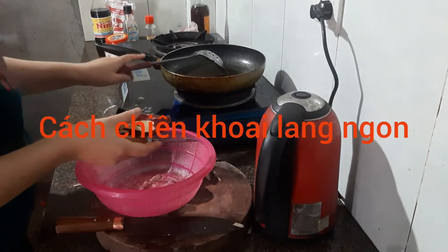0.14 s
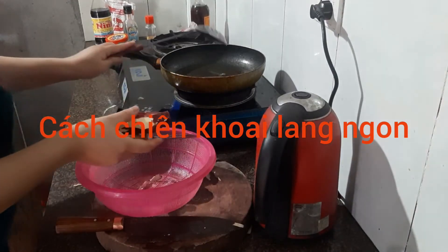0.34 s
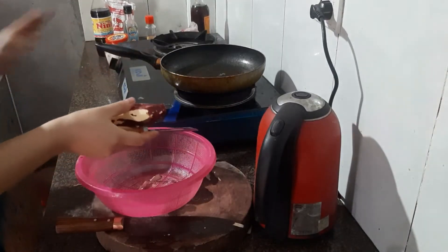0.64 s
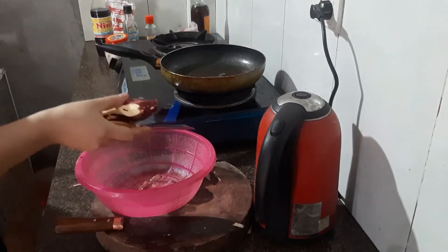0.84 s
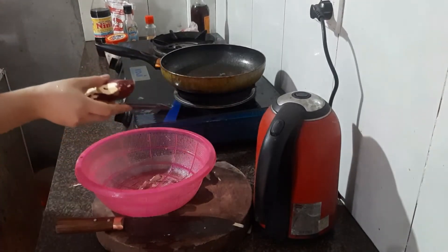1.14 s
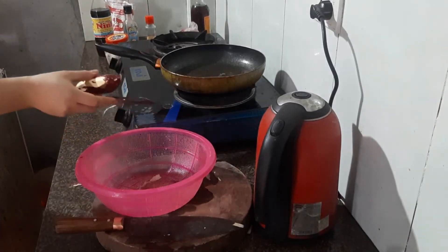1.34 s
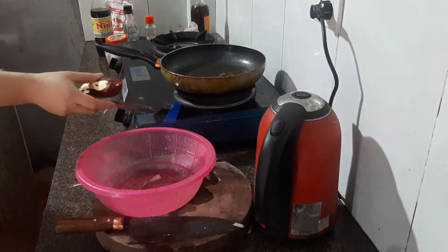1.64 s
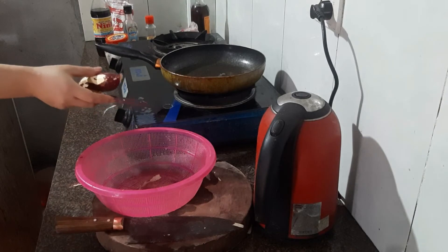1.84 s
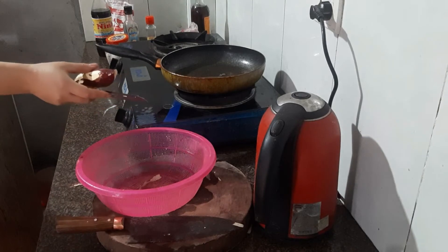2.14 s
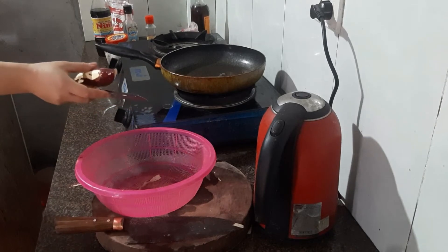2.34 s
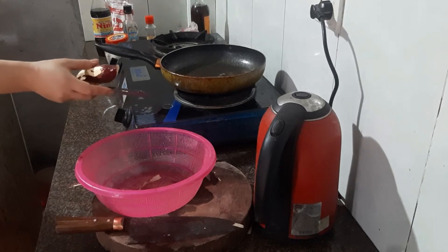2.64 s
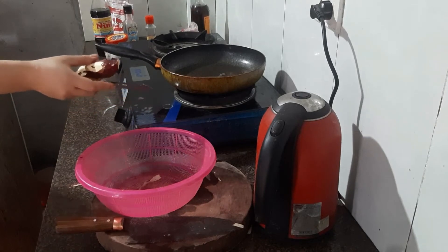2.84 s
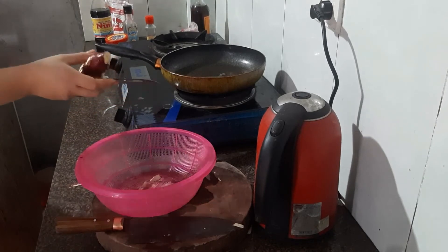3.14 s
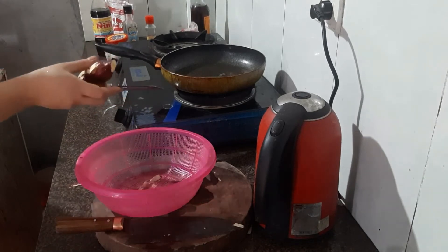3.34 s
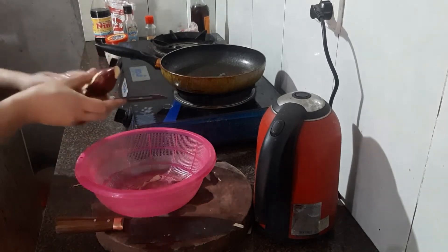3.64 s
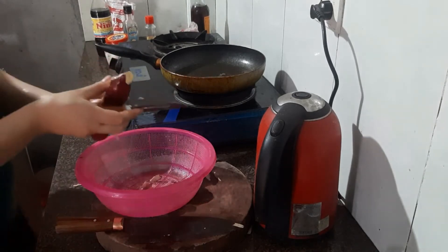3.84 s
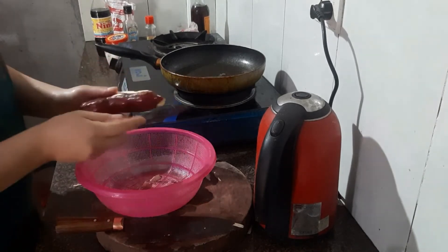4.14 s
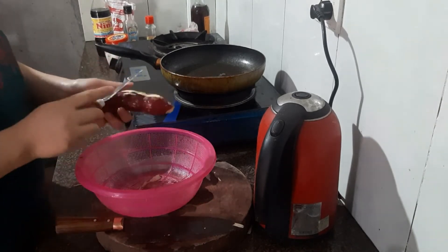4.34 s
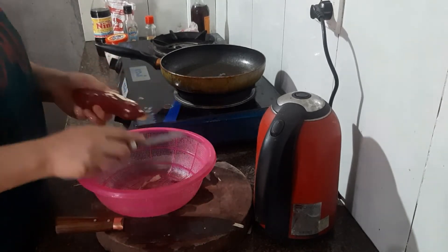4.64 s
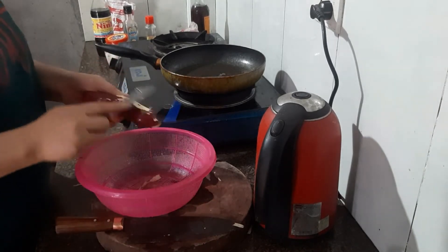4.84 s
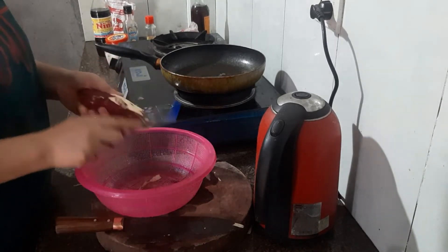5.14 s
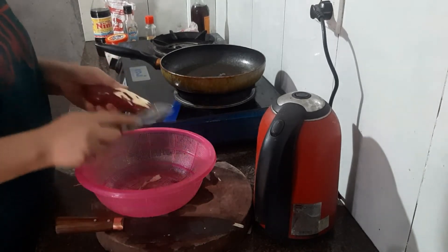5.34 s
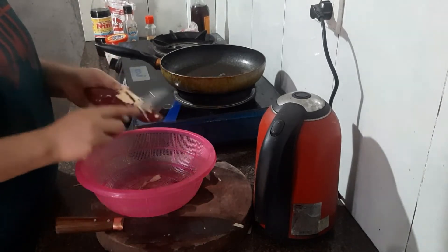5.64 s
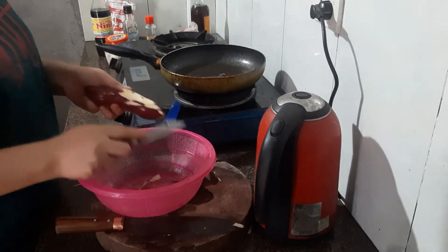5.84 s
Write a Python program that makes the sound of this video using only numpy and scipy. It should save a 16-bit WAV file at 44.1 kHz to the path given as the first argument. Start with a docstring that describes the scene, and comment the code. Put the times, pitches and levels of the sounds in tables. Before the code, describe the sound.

Kitchenware clatters and scrapes on a hard surface, then a small blade rasps at a raw tuber while an engine slows outside.

```python
"""Kitchen ware close by, left of centre in a hard-walled room: a dish taps down, metal and a basin are
knocked and scraped, then a blade peels a raw tuber. Blows and grit ring decaying modes; the peel is rasping noise.
Outside a single-cylinder engine slows as it passes, its low orders swelling in the room's bass modes.
Farther off, shaped noise makes street wash, a faint whine and an insect band; gliding tones make bird chirps."""
import sys
import numpy as np
from scipy import signal
from scipy.fft import rfft, irfft, next_fast_len
from scipy.io import wavfile
from scipy.ndimage import uniform_filter1d

SR = 44100
rng = np.random.default_rng(int(sys.argv[2]) if len(sys.argv) > 2 else 0)


def digitize_waveform(pressure):
    """Quantize a signal to 16-bit integers and store it at the path in sys.argv[1].

    Rows of a 2-D input are taken as channels; values are limited to [-1, 1].
    """
    field = np.atleast_2d(pressure).T
    bounded = np.clip(field, -1, 1)
    quanta = np.round(bounded * 32767).astype(np.int16)
    wavfile.write(sys.argv[1], SR, quanta)


N = 264159
# Table levels are relative: the room and the microphone act on them later.
LEAD_SAMPLES = 16  # sound reaches the left microphone port this much sooner


def amp(db):
    """Decibels to gain."""
    return 10 ** (np.asarray(db) / 20)


def evened(x):
    """Scales to rms 1."""
    return x / np.sqrt(np.mean(x ** 2) + 1e-20)


def read(points, hz):
    """Reads a spectrum table on a log-frequency axis."""
    f, value = np.transpose(points)
    return np.interp(np.log(hz + 1), np.log(f + 1), value)


def curve(rows):
    """Joins a (time, value) table over the whole time axis, holding its end values."""
    s, value = np.transpose(rows)
    return np.interp(np.arange(N) / SR, s, value)


def swell(start, length, db, start_db, fall_db_per_s):
    """Gain that climbs from start_db (relative to its top) over length, then falls steadily."""
    t = np.arange(N) / SR - start
    climb_db = start_db * np.clip(1 - t / length, 0, 1)
    fall_db = fall_db_per_s * np.maximum(t - length, 0)
    return (t > 0) * amp(db + climb_db - fall_db)


def colour(x, points):
    """Shapes the spectrum along the last axis."""
    size = next_fast_len(N + 4096)
    gain = amp(read(points, np.fft.rfftfreq(size, 1 / SR)))
    return irfft(rfft(x, size) * gain, size)[..., :N]


def ring(modes):
    """Impulse response of a struck object: decaying sines, each t60 at least 0.01 s."""
    t = np.arange(SR // 2) / SR
    out = 0
    for k, (hz, db, t60) in enumerate(modes):
        # neighbours start in opposite directions, which keeps the valleys and the bass clear
        out = out + (-1) ** k * amp(db - 60 * t / max(t60, .01)) * np.sin(2 * np.pi * hz * t)
    return out


def grains(rate, spread_db):
    """Random slips of uneven size and either sign, about rate a second, at rms 1."""
    size = amp(spread_db * np.minimum(rng.exponential(1, N), 4))
    sign = rng.choice([-1., 1.], N)
    return evened(size * sign * (rng.random(N) < rate / SR))


# How alike the two ports hear spread-out sound: pitch_hz, likeness (1 is identical)
PORT_LIKENESS = [(60, 1), (180, 0.93), (550, 0.96), (1650, -0.029), (4970, 0.2), (15000, -0.088)]


def diffuse(shape, patchy_db):
    """Two-port noise of rms 1 with drifting patches; shape gives the gain at each Hz."""
    frames, hz = N // 512 + 5, np.fft.rfftfreq(2048, 1 / SR)
    a, b, c, d, patches = rng.standard_normal((frames, 1025, 5)).T
    patches = uniform_filter1d(patches, size=14, axis=0)
    patches = evened(uniform_filter1d(patches, size=8, axis=1))
    same = np.clip(read(PORT_LIKENESS, hz), -1, 1)[:, None]
    left = a + 1j * b
    right = same * left + np.sqrt(1 - same ** 2) * (c + 1j * d)
    right *= np.exp(-2j * np.pi * hz * LEAD_SAMPLES / SR)[:, None]
    z = np.array([left, right]) * shape(hz)[:, None] * amp(patchy_db * patches)
    return evened(signal.istft(z, nperseg=2048, noverlap=1536)[1][:, :N])


# Spectra of the far street, as pitch_hz, relative level_db per Hz
RUMBLE = [(20, -13), (35, -20), (50, -4.5), (70, 0), (100, -2), (140, -5.5), (170, -8.5), (250, -20.5),
          (400, -43)]
ROAR = [(100, -29), (200, -4.5), (350, -0.5), (600, -10), (1100, -15.5), (2500, -28.5)]
TYRES = [(300, -38), (600, -7.5), (1000, -8.5), (1600, -10), (2500, -15), (4000, -20), (8000, -41)]
HISS = [(500, -29), (2000, 14), (3200, 1), (4400, 14), (5900, 4), (6500, -46), (11000, 3), (16000, -6)]
HISS_DB = -69
# Steady far traffic: rumble_db, roar_db, tyre_db
TRAFFIC_DB = (-56.5, -63, -71)
# Far vehicles going by: nearest_s, half_amplitude_s (time to fall to half amplitude), rumble_db, roar_db, tyre_db
PASSES = [(.15, 0.43, -67, -55.5, -58), (2, 0.17, -54, -76, -71), (4.65, 0.33, -47, -61.5, -55.5)]
# Narrow fuzzy hums, whine and insect band among them: pitch_hz, width_hz (at half gain), level_db
HUMS = [(68.3, 6.4, -65), (86.5, 7.3, -66.5), (143, 10, -67), (220.6, 11.2, -60), (189.6, 11, -68.5),
        (1510, 140, -71.5), (4300, 890, -76.5), (6030, 40, -81.5), (11800, 41, -82)]


def street():
    """Rumble, roar and tyre noise swell as far vehicles pass, over patchy hiss and narrow fuzzy hums."""
    t = np.arange(N) / SR
    power = amp(TRAFFIC_DB)[:, None] ** 2
    for nearest, half, *db in PASSES:
        power = power + amp(db)[:, None] ** 2 / (1 + ((t - nearest) / half) ** 2) ** 2
    gains = [*np.sqrt(power), amp(HISS_DB)]
    out = 0
    for shape, gain in zip((RUMBLE, ROAR, TYRES, HISS), gains):
        out = out + gain * diffuse(lambda hz: amp(read(shape, hz)), patchy_db=2.94)

    def peaks(f):
        """One narrow peak for each hum."""
        return sum(amp(db) / np.sqrt(w) / (1 + ((f - hz) / w * 2) ** 2) for hz, w, db in HUMS)

    hums_db = 10 * np.log10(sum(amp(db) ** 2 for _, _, db in HUMS))
    return out + amp(hums_db) * diffuse(peaks, patchy_db=4.0)


# Modes of the small dish: pitch_hz, level_db, t60_s
DISH = [(880, 3, 0.07), (1345, 4.5, 0.04), (1770, -1, 0.11), (1950, -3.5, 0.087), (2100, -3, 0.056),
        (2620, -0.5, 0.11), (3330, -13, 0.11)]
# The dish is set down and rocks: start_s, level_db
DISH_TAPS = [(0.225, -45), (0.285, -63), (0.315, -60)]


def dish():
    """Light taps ring the modes of the crockery."""
    rung = ring(DISH)
    return sum(np.pad(amp(db) * rung, (round(s * SR), N))[:N] for s, db in DISH_TAPS)


# Strong modes of the metal ware: pitch_hz, level_db, t60_s
METAL = [(1460, -13.5, 0.14), (1530, 0.5, 0.051), (2070, -8, .06), (2298, -0.5, 0.044), (2367, -0.5, 0.084),
         (2560, 4.5, 0.017), (2706, 1.5, 0.062), (2866, -7, 0.07), (3780, -15, 0.15), (4900, -1.5, 0.033),
         (5190, 1, 0.01), (6300, -1.5, 0.037), (6600, -12, 0.026), (7260, -10, 0.073), (8350, 6, 0.052),
         (10360, 5, 0.018), (11120, -10.5, 0.24), (12480, -17, 0.043)]


def metal():
    """Impulse response of the ware: strong modes over a dense crowd of short, weak ones."""
    spot, size = rng.random((2, 90))
    hz = 1750 * 7.5 ** spot
    return ring(METAL) + ring(zip(hz, -15 + 8 * size, 0.032 + 0 * hz))


# Blows: start_s, crack_db, crack_tilt_db (an octave), cabinet_db, basin_db, metal_db
KNOCKS = [(0.225, -27.5, -11.5, -52, -52, -90), (1.507, -22.5, -9, -31, -84, -86),
          (1.518, -30.5, 11, -31.5, -44.5, -85), (1.541, -30, 20, -39.5, -72, -90),
          (1.571, -32.5, -5.5, -56, -79, -90), (1.868, -14, 3, -40, -39.5, -24.5),
          (2.313, -30, 9, -76, -43.5, -77), (2.397, -19, 26, -77, -21, -25.5),
          (2.41, -16, 6, -72, -39.5, -34), (2.424, -25, 16, -38.5, -40, -47),
          (2.596, -36, 18, -73, -43, -41), (2.618, -42, 16, -78, -55, -77),
          (2.642, -49, 8, -74, -47.5, -74)]
# The blade nicks the tuber or a peel drops in the basin: start_s, crack_db, basin_db
NICKS = [(2.981, -38, -66), (4.684, -48, -79), (4.983, -47, -55), (5.199, -32, -56.5), (5.72, -37, -63)]
NICK_TILT_DB = 2  # an octave
# Modes of the cabinet and of the plastic basin: pitch_hz, level_db, t60_s
CABINET = [(50, -3.5, 0.4), (100, -8, 0.099), (213.4, 3, 0.12), (235.6, -2.5, 0.055), (283, -9, 0.12),
           (374, -14, 0.077)]
BASIN = [(120.5, -8.5, 0.4), (342, -8, 0.1), (394.3, -1, 0.069), (491, 4, 0.041), (542, 4.5, 0.043),
         (807, 4, 0.017), (900, 2, 0.029), (969, 15.5, 0.0093), (1223, 11.5, 0.016), (1527, 15, 0.014),
         (1860, 4, 0.012), (2036, 8.5, 0.017), (2470, 1, 0.024), (3020, -0.5, 0.018), (3710, -2.5, 0.018)]


def knocks(ware):
    """Each blow is a click that cracks and rings the cabinet, the plastic basin and the metal."""
    crack, blows = np.zeros(N + 1024), np.zeros((3, N))
    hz = np.fft.rfftfreq(1024, 1 / SR)
    nicks = [(s, db, NICK_TILT_DB, -np.inf, basin_db, -np.inf) for s, db, basin_db in NICKS]
    for s, db, tilt_db, *strength_db in KNOCKS + nicks:
        at = round(s * SR)
        # little bass from a small contact; each blow's own tilt makes it dull or bright
        tilt = amp(tilt_db * np.log2((hz + 700) / 2000))
        click = irfft(tilt * hz ** 2 / (hz ** 2 + 400 ** 2))
        click = np.roll(click, 64) * signal.windows.tukey(1024, .1)
        # every click has the same energy before its crack_db
        crack[at - 64:at + 960] += amp(db) * click / np.linalg.norm(click) * 4
        blows[:, at] = amp(strength_db)
    # a light basin moves no air below its lowest mode
    high_pass = signal.butter(3, 105, "high", fs=SR, output="sos")
    bodies = ring(CABINET), signal.sosfilt(high_pass, ring(BASIN)), ware
    rung = sum(signal.fftconvolve(x, body)[:N] for x, body in zip(blows, bodies))
    return crack[:N] + rung


# Metal scrapes over the worktop: loudest_s, build_up_s, level_db
SCRAPES = [(2.313, 0.016, -37), (2.383, 0.062, -32.5), (2.451, 0.041, -38), (2.598, 0.027, -42)]
SCRAPE_START_DB, SCRAPE_FALL_DB_PER_S = -26, 552  # start is relative to the loudest point


def drag(ware):
    """Stick-slip grit hisses and rings both metal and basin."""
    level = sum(swell(s - build, build, db, SCRAPE_START_DB, SCRAPE_FALL_DB_PER_S) for s, build, db in SCRAPES)
    slips = grains(4000, 1.0) * level
    body = amp(-47) * ware + amp(-34.0) * ring(BASIN)
    hiss = colour(slips, [(200, -33), (600, -36), (1500, 7.0), (5000, 7.5), (15000, 3.0)])
    return hiss + signal.fftconvolve(slips, body)[:N]


# The engine slows outside: time_s, firings_per_s
FIRING = [(2.5, 24.6), (3, 24.4), (3.25, 24.1), (3.6, 23.1), (4, 22.1), (4.35, 21.3), (4.7, 20.7),
          (5.17, 19.8), (5.5, 19.2), (5.99, 18.2)]
# Orders as multiples of the firing rate, and the level_db of each at the pipe
ORDER_NUMBERS = (2, 3, 3.5, 4, 5, 6, 7)
ORDER_DB = (-8, 5, -11, 0.5, -4.5, -8.5, -18)
# The engine's passage, before order and room-mode gains: time_s, level_db
ENGINE_LEVEL = [(2.5, -60), (2.8, -48.5), (3.1, -44.0), (3.4, -47.5), (3.7, -54), (4.1, -47), (4.5, -51.5),
                (4.8, -49.5), (4.95, -51), (5.15, -38.5), (5.5, -33.5), (5.7, -35.5), (5.99, -48)]
# Bass modes of the kitchen: pitch_hz, width_hz (offset where gain is a quarter), level_db
BASS_MODES = [(44, 3.6, 1.5), (57.6, 0.49, -21), (63.04, 2.2, 8), (69.3, 1.5, -3.5), (80.66, 2.9, 5),
              (101.45, 4.65, 5.5), (121.14, 1.7, 2), (140.5, 3.3, -5)]


def engine():
    """Orders of the firing rate slide down, each swelling as it meets a bass mode of the room."""
    fade = np.clip((np.arange(N) / SR - FIRING[0][0]) * 10, 0, 1)
    rate = curve(FIRING)
    turns = np.cumsum(rate) / SR + rng.random()  # one shared phase keeps the orders in step

    def boost(f):
        """Gain of the room's bass modes at each Hz."""
        return sum(amp(db) / (1 + ((f - hz) / w) ** 2) ** 2 for hz, w, db in BASS_MODES)

    orders = 0
    for k, db in zip(ORDER_NUMBERS, ORDER_DB):
        orders = orders + amp(db) * boost(k * rate) * np.cos(2 * np.pi * k * turns)
    return fade * np.sqrt(2) * amp(curve(ENGINE_LEVEL)) * orders


# Peeling strokes: start_s, length_s (of the climb), level_db, first_bite_db (relative to level_db)
STROKES = [(2.99, 0.066, -61, -3), (4.531, 0.08, -52.5, -6.5), (4.653, 0.021, -52, -15),
           (5.069, 0.1, -47.5, -8.5), (5.609, 0.12, -50.5, -0.5)]
# Spectrum of the rasp: pitch_hz, relative level_db per Hz
BLADE = [(1000, -15), (2000, 0.5), (3000, 1.5), (4000, 5.5), (5300, 2.5), (6400, 8), (7800, 2.5),
         (11000, 5), (16000, -0.5)]
BITE_S, LIFT_DB_PER_S = 0.022, 146  # level smoothing time; fall after each stroke


def peeling():
    """The blade bites, digs in and tears fibres in a dense, fine rasp that the walls scatter."""
    level = sum(swell(*row, LIFT_DB_PER_S) for row in STROKES)
    level = uniform_filter1d(level, max(int(BITE_S * SR), 1))
    near = evened(colour(grains(3300, 2.6), BLADE))
    far = diffuse(lambda hz: amp(read(BLADE, hz)), patchy_db=1)
    return level * (0.25 * near + 1.46 * far)


# Far bird: start_s, length_s, first_pitch_hz, last_pitch_hz, level_db
CHIRPS = [(3.66, 0.047, 6850, 6700, -63), (3.735, .055, 5850, 5340, -59.5),
          (3.878, .135, 5900, 4320, -57.5)]
# share of the length in which pitch settles; rise time; start and end level relative to the top
CHIRP_DROP, CHIRP_RISE_S, CHIRP_FADE_DB = .25, 0.013, -19


def bird():
    """Far falling chirps: gliding sines blurred by a quick random waver of pitch."""
    out = np.zeros(N)
    for start, length, first_hz, last_hz, db in CHIRPS:
        t = np.arange(N) / SR - start
        settling = np.exp(-(np.maximum(t, 0) / length / CHIRP_DROP) ** 2)
        hz = last_hz + (first_hz - last_hz) * settling
        level = (t < length) * swell(start, CHIRP_RISE_S, db, CHIRP_FADE_DB, -CHIRP_FADE_DB / length)
        waver = 1 + .012 * evened(uniform_filter1d(rng.standard_normal(N), size=200))
        out += uniform_filter1d(level, size=300) * np.sin(2 * np.pi * np.cumsum(hz * waver) / SR)
    return out


# Decay of the hard-walled kitchen: pitch_hz, t60_s
ROOM = [(100, 0.19), (300, 0.77), (1000, 0.55), (4000, 0.63), (15000, 0.37)]


def room(x, direct_db):
    """Direct sound plus a tail of sparse random taps that builds up, each band dying at its own speed."""
    taps = np.zeros((2, SR))
    grid = np.arange(60, SR - 20, 12)
    at = grid + rng.integers(0, 12, (2, len(grid)))
    np.put_along_axis(taps, at, rng.choice([-1., 1.], at.shape), 1)
    hz, t, z = signal.stft(taps, SR, nperseg=512)
    same = 1 / (1 + (hz[:, None] / 520) ** 2)  # only the bass is alike at both ports
    z[1] = same * z[0] + np.sqrt(1 - same ** 2) * z[1]
    decay = amp(-60 * t / read(ROOM, hz)[:, None])
    tail = signal.istft(z * decay, SR, nperseg=512)[1][:, :SR]
    tail *= 1 - 0.81 * np.exp(-np.arange(SR) / SR / 0.0041)
    tail /= np.linalg.norm(tail[0])
    tail[[0, 1], [0, LEAD_SAMPLES]] += amp(direct_db)
    return signal.fftconvolve(x, tail, axes=1)[:, :N]


def scene():
    """Everything in the kitchen air; the clatter stands to the left, the dish is nearer and drier."""
    ware, tap = metal(), dish()
    clatter = (knocks(ware) + drag(ware)) * amp([[1.1], [-1.1]])
    in_room = room(clatter + tap + bird(), direct_db=-12)
    return in_room + amp(-2.5) * tap + peeling() + engine() + street()


# Response of the microphone: pitch_hz, level_db
MIC = [(15, -27), (40, -5.5), (60, -1.5), (7900, -4.5), (8400, -20), (9800, -13), (11000, -10),
       (12000, -7.5), (15000, -5)]
EDGE_HZ = 15900  # upper band limit


def record(dry):
    """Microphone colour with a treble dip, then the band limit."""
    edge = signal.firwin(511, EDGE_HZ, window=("kaiser", 9), fs=SR)
    return signal.oaconvolve(colour(dry, MIC), edge[None], "same")


dry = scene()
out = record(dry)
digitize_waveform(out)
```